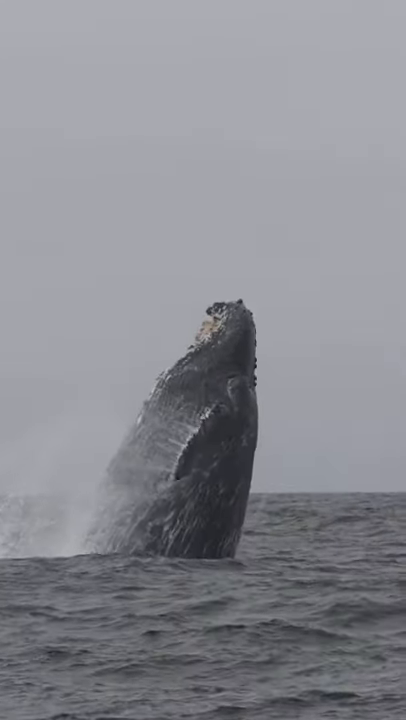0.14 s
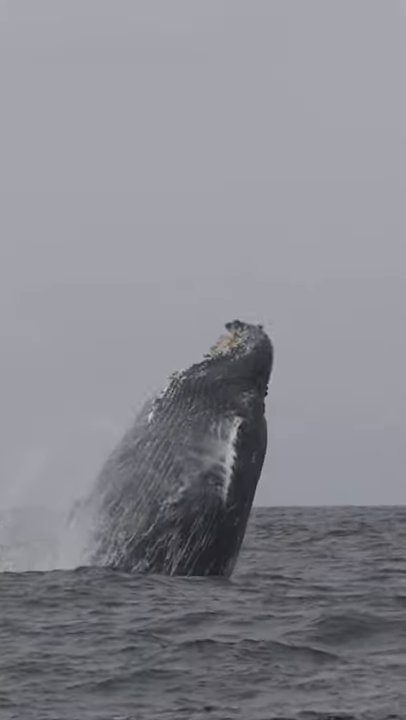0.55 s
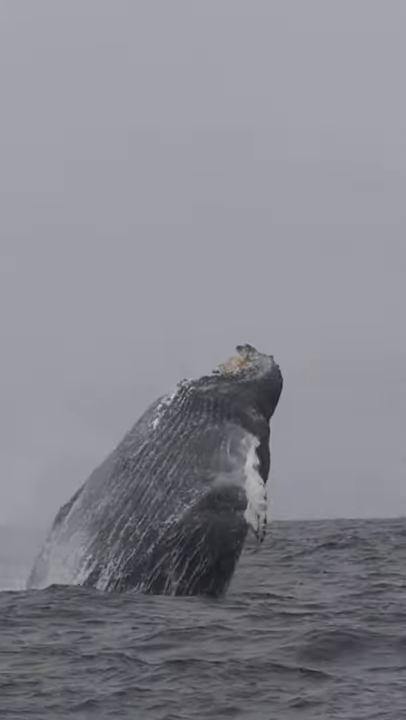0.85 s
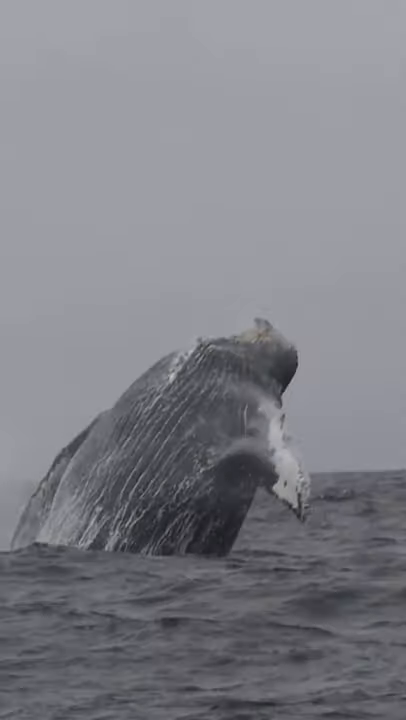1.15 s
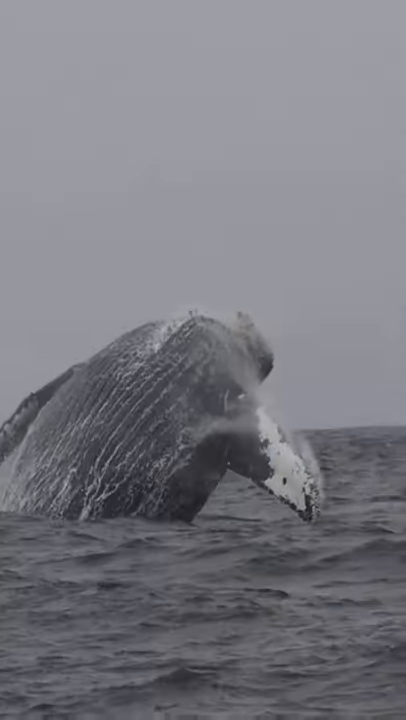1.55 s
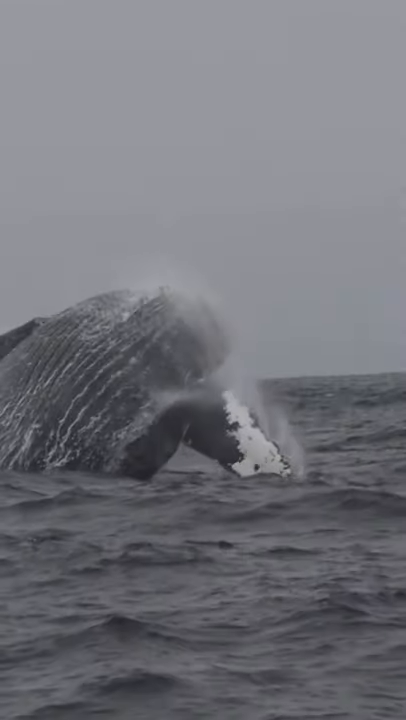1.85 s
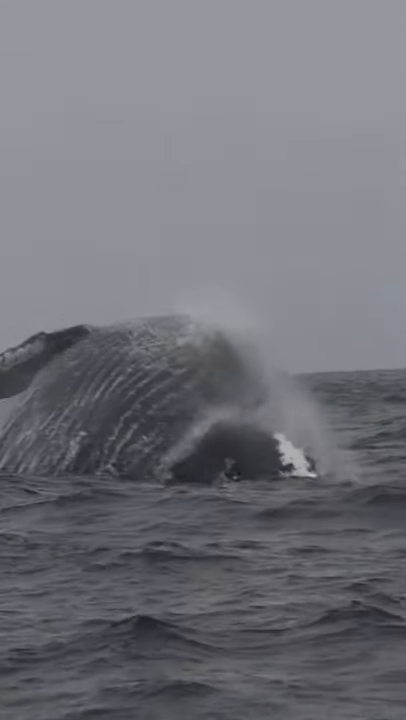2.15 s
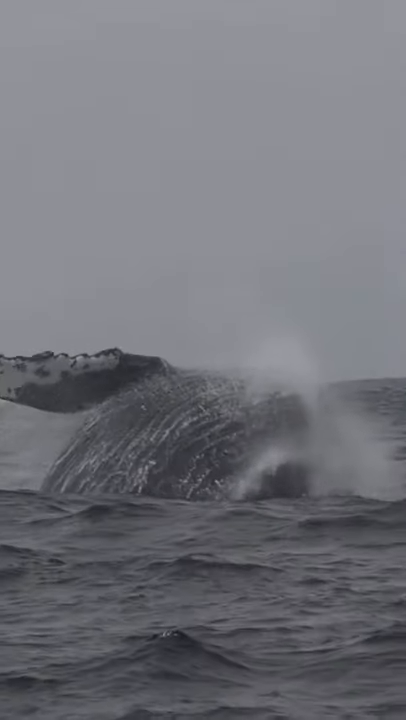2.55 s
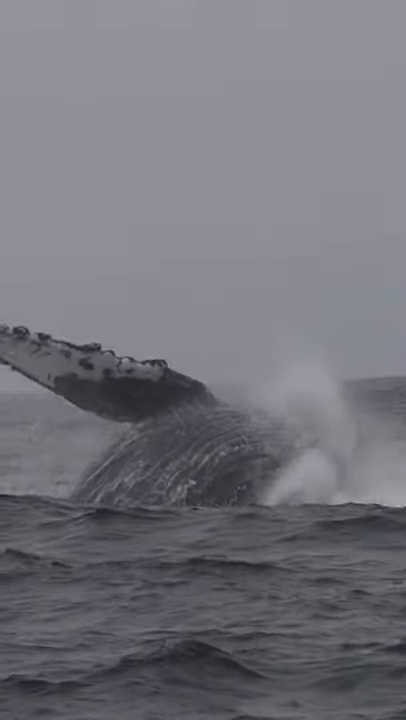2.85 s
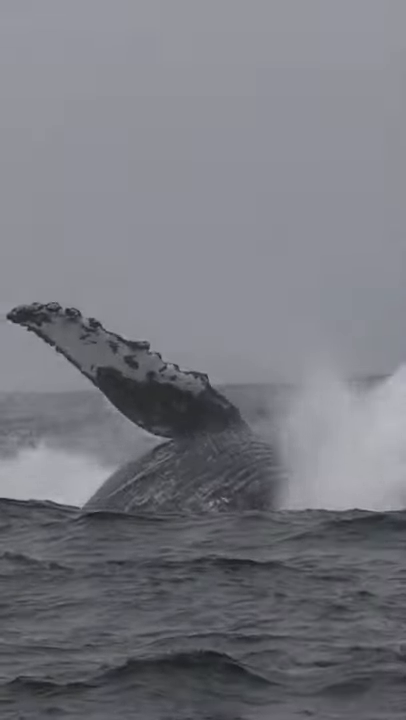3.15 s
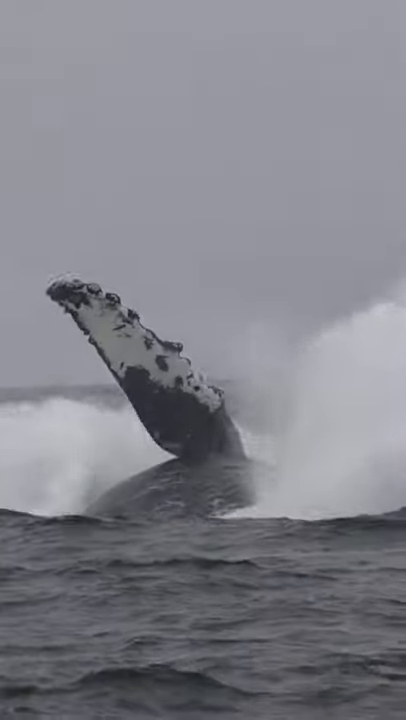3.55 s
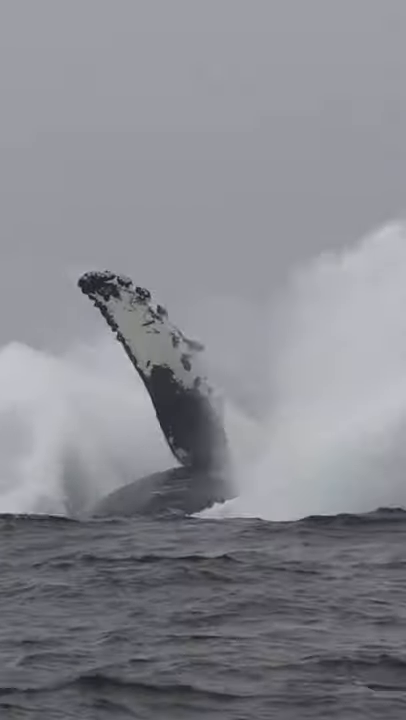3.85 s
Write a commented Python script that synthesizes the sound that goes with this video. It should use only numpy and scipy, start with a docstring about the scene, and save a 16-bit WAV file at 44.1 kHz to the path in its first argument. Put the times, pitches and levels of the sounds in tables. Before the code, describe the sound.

Choppy open sea washes steadily, heard from a boat; a sharp short splash with spray comes late as a whale falls back, while a growing gust rumbles and thumps on the microphone.

```python
"""Open, choppy sea heard from a boat while a breaching whale falls back into the water.
Waves wash and foam swells as filtered noise made grainy by drops; louder bursts of such noise
form a sharp splash and a short shower of spray. A gust builds through the second half: low noise
rumbles, flutters and booms in surges, and single pressure pulses buffet the microphone."""
import sys
import numpy as np
from scipy import signal
from scipy.fft import rfft, irfft
from scipy.io import wavfile

SR = 44100
rng = np.random.default_rng(int(sys.argv[2]) if len(sys.argv) > 2 else 0)


def log_audio(samples):
    """Write samples as a 16-bit WAV file to the path given in sys.argv[1]."""
    # one column per channel
    frames = np.atleast_2d(samples).T
    # limit to full scale, then quantise
    limited = np.clip(frames, -1, 1)
    pcm = np.round(limited * 32767).astype(np.int16)
    wavfile.write(sys.argv[1], SR, pcm)


N = 176400  # samples

# Relative spectrum of the waves' wash: (frequency [Hz], density [dB per Hz])
SEA_SPECTRUM = [(25, -8.5), (60, -7), (110, -6), (165, -2), (225, -2), (320, -2.5), (520, -5.5), (720, -8),
                (1000, -12), (1700, -17.5), (2500, -21.5), (3200, -21), (4200, -25), (5300, -27.5),
                (7000, -34), (10000, -58)]
# Relative spectrum of churning foam: (frequency [Hz], density [dB per Hz])
FOAM_SPECTRUM = [(100, -10.5), (400, 5.5), (900, -2), (1400, -4.5), (1900, -4.5), (2600, -8.5),
                 (3500, -8.5), (4300, -12), (5500, -16.5), (7500, -19), (10000, -49.5)]
# Swelling of the foam: (time [s], level [dB])
FOAM_LEVEL = [(0, -54.5), (1.2, -49), (1.9, -43), (2.2, -39.5), (2.45, -39.5), (2.75, -35), (3.06, -32.5),
              (3.3, -36), (3.45, -35.8), (3.62, -36.5), (3.83, -32.5), (3.89, -30.5), (3.93, -32), (4, -33)]
# Relative spectrum of falling water, before tilt: (frequency [Hz], density [dB per Hz])
SPLASH_SPECTRUM = [(200, -10), (550, -1), (800, 8.5), (1400, 3), (2200, 0), (3500, -2), (5500, -8),
                   (7500, -17.5), (10000, -30.5)]
# Stages of the splash: (start [s], attack [s], hold [s], release [s], level [dB],
# spectral tilt [dB per octave], left over right [dB])
SPLASH_STAGES = [(2.781, .001, 0.0024, .003, -28.5, 3, -1), (2.784, .004, 0.038, 0.043, -28, -3.5, -2),
                 (2.787, 0.0068, .013, .019, -31.5, 8.5, 0), (2.82, 0.0039, 0.039, 0.054, -39, 4, -5),
                 (2.859, .05, .17, 0.041, -34, 1.5, -2)]
# Strength of the gust, as the level of its rumble: (time [s], level [dB])
RUMBLE_LEVEL = [(0, -60), (.3, -48), (.9, -48.5), (1.5, -41.5), (1.95, -35), (2.2, -31.5), (2.32, -28.5),
                (2.5, -25), (2.8, -24), (2.95, -26.5), (3.18, -22.5), (3.32, -24.5), (3.48, -22),
                (3.62, -24.5), (3.75, -22.5), (3.8, -20.5), (3.85, -26), (4, -34)]
# Flutter of small eddies: (time [s], level [dB])
FLUTTER_LEVEL = [(0, -54.5), (1.3, -43.5), (2.1, -35.5), (2.7, -34), (3.0, -36), (3.1, -28), (3.5, -25),
                 (3.87, -25), (4, -25)]
# Relative spectrum of large eddies: (frequency [Hz], density [dB per Hz])
RUMBLE_SPECTRUM = [(10, -15.5), (28, 2.5), (60, -3), (78, -4), (98, -7), (135, -8), (180, -12), (350, -26),
                   (900, -44.5), (3000, -83)]
# Relative spectrum of small eddies: (frequency [Hz], density [dB per Hz])
FLUTTER_SPECTRUM = [(50, -12.5), (95, -2.5), (128, -0.5), (172, 0.5), (260, -6), (450, -17), (1000, -41.5),
                    (3000, -76)]
# Booming surges of the gust: (centre time [s], Gaussian spread [s], level [dB], centre frequency [Hz])
SURGES = [(3.051, 0.037, -25.5, 146), (3.174, .02, -24.5, 130), (3.287, 0.028, -22.5, 159),
          (3.36, 0.023, -23.5, 180), (3.456, 0.037, -25.5, 69), (3.477, 0.022, -26.5, 302),
          (3.561, 0.018, -25, 280), (3.678, 0.029, -16.5, 124), (3.71, 0.018, -18, 45),
          (3.761, .012, -13.5, 50), (3.808, 0.019, -18.5, 139)]
# Single buffets: (centre time [s], half length of the core [s], peak level [dB])
BUFFETS = [(3.182, .0054, -12.5), (3.346, .0022, -16.5), (3.464, 0.0049, -21), (3.538, 0.0024, -14),
           (3.587, 0.0045, -8), (3.683, .0022, -11), (3.962, 0.0029, -8.5)]
# Likeness of the two microphone ports for open water: (frequency [Hz], correlation [0-1])
WATER_LIKENESS = [(60, 0.5), (250, 0.53), (900, 0.53), (2000, 0.75), (2700, 0.32), (3600, 0.5),
                  (5200, 0.86), (7000, 0), (10000, 0)]
# Phase by which the left port trails the right for open water: (frequency [Hz], phase [rad])
PORT_LAG = [(500, 0), (1290, 0.45), (2240, -0.3), (2760, 0.27), (3790, 1.42), (4800, 0.83), (6200, 0.97),
            (7900, 2.5)]

SEA_START_DB, SEA_RISE_DB_PER_S = -34.5, 1.24
SEA_PAN_DB, FOAM_PAN_DB = 3, 5  # left over right
DROPS_PER_S, DROP_DECAY_S = 3000, 0.00047  # decay time of a drop's energy
DROP_SPREAD_DB = 3.5  # mean of the exponential spread of drop sizes, before its cap
SEA_DROP_SHARE, FOAM_DROP_SHARE, SPLASH_DROP_SHARE = 0.19, 0.47, 0.46  # share of power, 0-1
SPLASH_LIKENESS, WIND_LIKENESS = 0.84, 0.28  # correlation of the ports, 0-1
SURGE_SLOPE_DB = 15  # fall per octave either side of a surge's centre
TOP_HZ = 10100


def undb(db):
    """Amplitude gain is ten to the power of the level in decibels over twenty."""
    return 10 ** (np.asarray(db) / 20)


def times():
    """Sampling divides time into equal steps, given here in seconds."""
    return np.arange(N) / SR


def curve(rows):
    """Linear interpolation in time joins (time, value) rows."""
    return np.interp(times(), *np.array(rows).T)


def bins():
    """The discrete spectrum has evenly spaced frequencies; zero is raised to 1 Hz for logarithms."""
    return np.maximum(np.arange(N // 2 + 1) * SR / N, 1)


def over_pitch(rows):
    """Linear interpolation over log frequency joins (frequency, value) rows."""
    hz, value = np.array(rows).T
    return np.interp(np.log(bins()), np.log(hz), value)


def walk(rate):
    """Random fluctuation: straight lines join `rate` random knots per second, with a spread near 1."""
    knots = rng.standard_normal(1024)
    # 1.2 offsets the spread lost between knots
    return 1.2 * np.interp(times() * rate, np.arange(len(knots)), knots)


def ports(pair, spectrum, likeness, pan_db, lag=0, tilt_db=0):
    """Partial coherence: sum and difference of two filtered noises give partly alike ports."""
    likeness = np.clip(likeness, 0, 1)
    gain = undb(over_pitch(spectrum) + tilt_db * np.log2(bins()))
    mid, side = rfft(pair) * gain
    mid = mid * np.sqrt(1 + likeness)
    side = side * np.sqrt(1 - likeness)
    left = (mid + side) * np.exp(-1j * lag)
    right = mid - side
    stereo = irfft(np.array([left, right]), N)
    stereo = stereo * undb(np.array([[pan_db], [-pan_db]]) / 2)
    return stereo / np.std(stereo.mean(axis=0))  # unit spread of the mono sum's half


def drops(share):
    """Shot noise: brief decaying drops of uneven size share the power with a smooth hiss."""
    sizes = undb(DROP_SPREAD_DB * np.minimum(rng.exponential(size=N), 5))
    hits = (rng.random(N) < DROPS_PER_S / SR) * sizes ** 2
    decay = np.exp(-1 / (DROP_DECAY_S * SR))
    energy = signal.lfilter([1], [1, -decay], hits)
    share = np.clip(share, 0, 1)
    power = 1 - share + share * energy / energy.mean()
    return np.sqrt(power) * rng.standard_normal((2, N))


def water(spectrum, pan_db, share):
    """An extended source: coherence and phase between the ports vary with frequency."""
    return ports(drops(share), spectrum, over_pitch(WATER_LIKENESS), pan_db, over_pitch(PORT_LAG))


def sea():
    """Superposition of many waves makes a broad noise, heaving a little and slowly growing."""
    db = SEA_START_DB + SEA_RISE_DB_PER_S * times()
    db = db + 0.092 * walk(1.9) + 0.11 * walk(25.14)
    return water(SEA_SPECTRUM, SEA_PAN_DB, SEA_DROP_SHARE) * undb(db)


def foam():
    """White water is shot noise with a large share of drops, so it churns and fizzes."""
    db = curve(FOAM_LEVEL) + 0.4 * walk(21.98)
    return water(FOAM_SPECTRUM, FOAM_PAN_DB, FOAM_DROP_SHARE) * undb(db)


def wind():
    """Turbulence: large eddies rumble unlike at the two ports, small ones flutter alike at both."""
    rumble = ports(rng.standard_normal((2, N)), RUMBLE_SPECTRUM, WIND_LIKENESS, pan_db=-0.8)
    flutter = ports(rng.standard_normal((2, N)), FLUTTER_SPECTRUM, likeness=1.0, pan_db=1.5)
    rumble_db = curve(RUMBLE_LEVEL) + 0.74 * walk(16)
    flutter_db = curve(FLUTTER_LEVEL) + 0.81 * walk(14)
    return rumble * undb(rumble_db) + flutter * undb(flutter_db)


def surges():
    """Eddy size sets pitch: short Gaussian surges of noise each boom about one centre frequency."""
    t, out = times(), 0
    for when, spread, db, hz in SURGES:
        spectrum = [(hz * 2. ** octave, -SURGE_SLOPE_DB * abs(octave)) for octave in range(-6, 7)]
        boom = ports(rng.standard_normal((2, N)), spectrum, likeness=1.0, pan_db=0)
        shape = np.exp(-((t - when) / spread) ** 2 / 2)
        out = out + boom * undb(db) * shape
    return out


def buffets():
    """Vortex pressure: a strong eddy's low-pressure core, with raised flanks, passes both ports alike."""
    t, out = times(), 0
    for when, half_length, db in BUFFETS:
        u = (t - when) / half_length
        out = out - undb(db) * (1 - u ** 2) * np.exp(-u ** 2 / 2)
    return out


def splashes():
    """Impact and spray: bursts of drop noise, without lag between ports, rise, hold and decay."""
    t, out = times(), 0
    for start, attack, hold, release, db, tilt_db, pan_db in SPLASH_STAGES:
        rise = np.clip((t - start) / attack, 0, 1)
        fall = np.exp(-np.maximum(t - start - attack - hold, 0) / release)
        noise = drops(SPLASH_DROP_SHARE)
        spray = ports(noise, SPLASH_SPECTRUM, SPLASH_LIKENESS, pan_db, tilt_db=tilt_db)
        out = out + rise * fall * undb(db + 0.78 * walk(120)) * spray
    return out


def scene():
    """Linear superposition: the pressures of water and wind add."""
    return sea() + foam() + wind() + surges() + buffets() + splashes()


def record(dry):
    """Band limitation: a steep elliptic low-pass filter cuts the top."""
    low_pass = signal.ellip(10, .2, 80, TOP_HZ, fs=SR, output="sos")  # order, ripple dB, rejection dB
    return signal.sosfilt(low_pass, dry)


dry = scene()
out = record(dry)
log_audio(out)
```